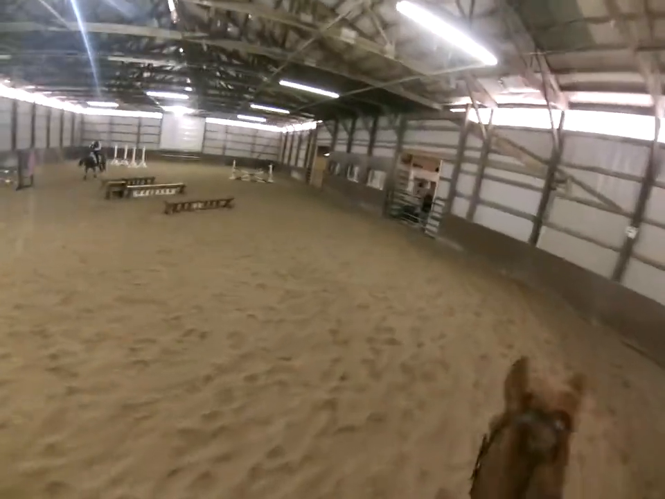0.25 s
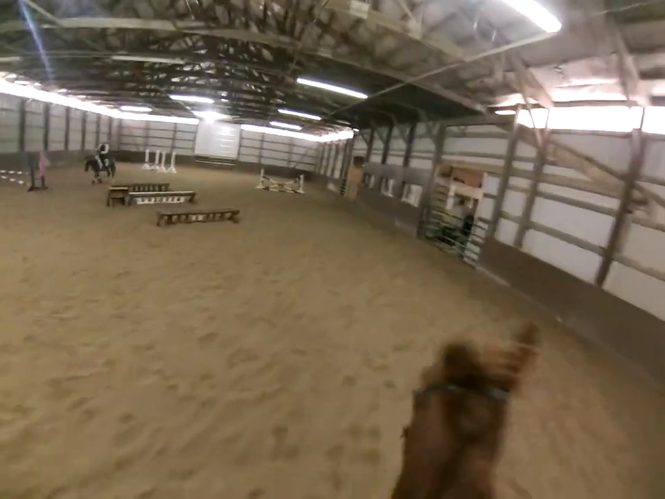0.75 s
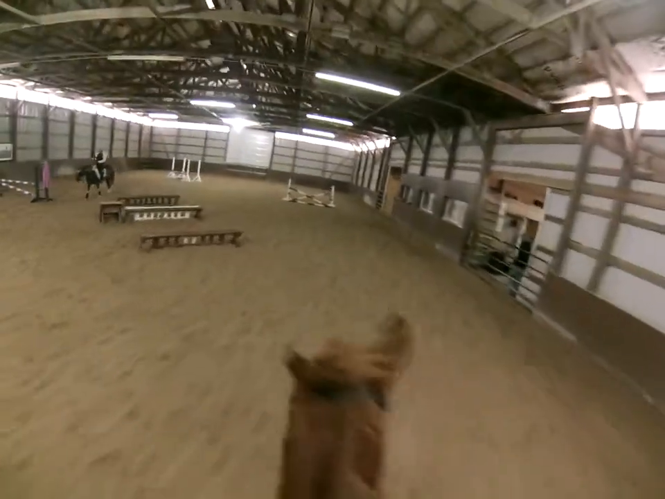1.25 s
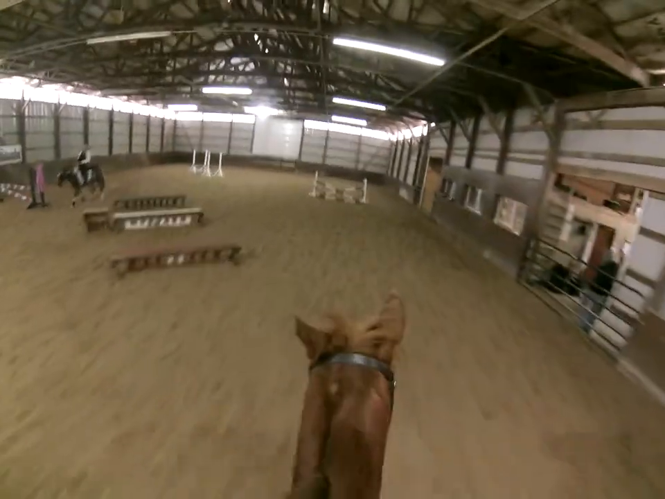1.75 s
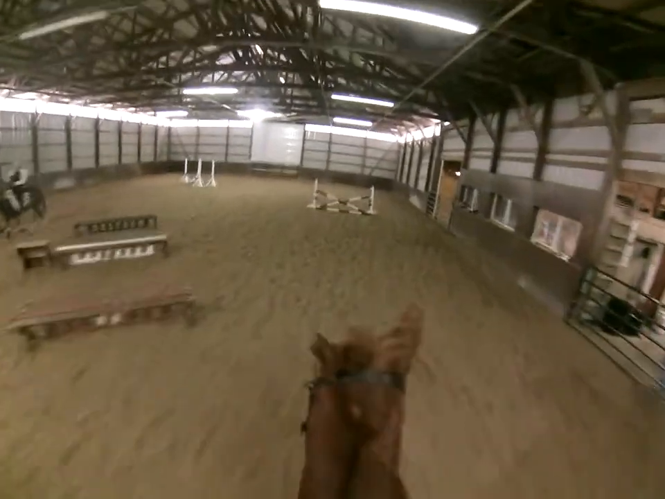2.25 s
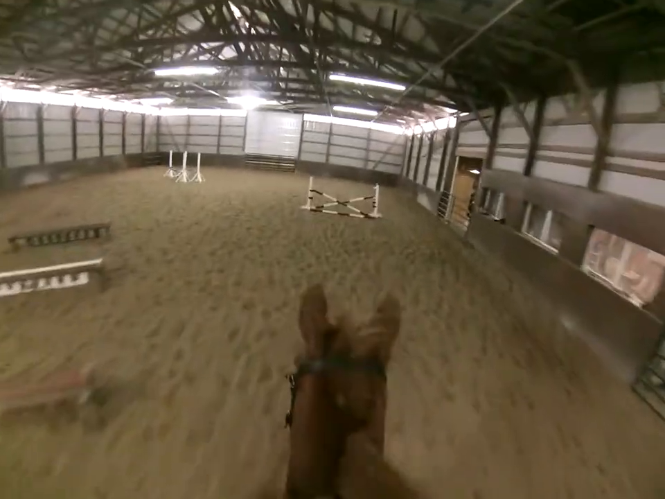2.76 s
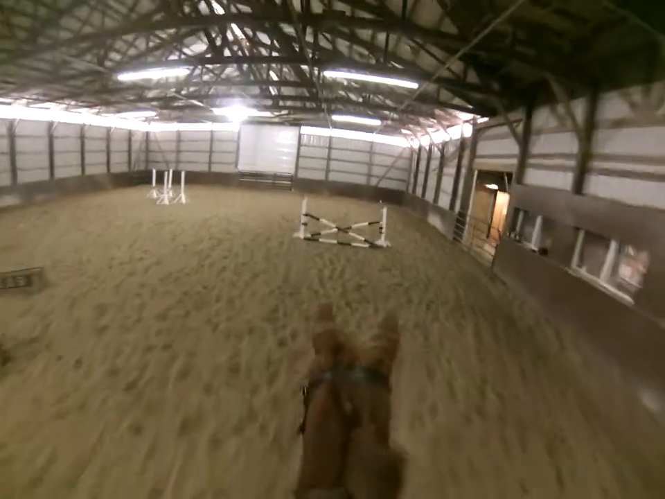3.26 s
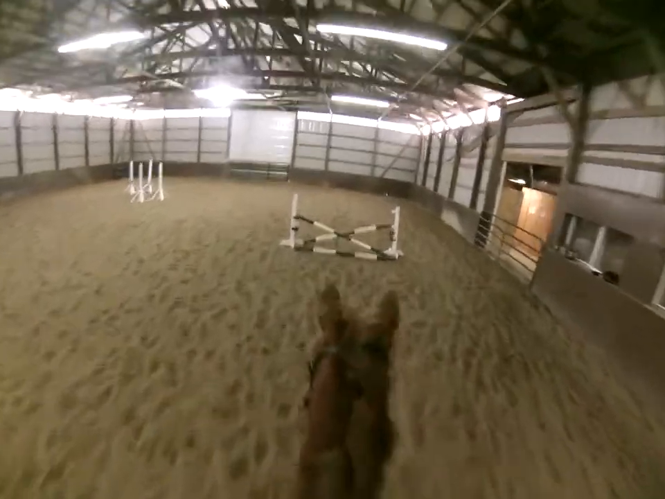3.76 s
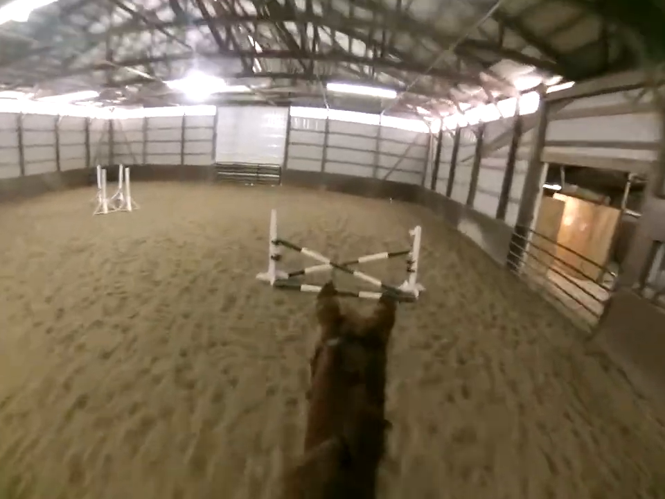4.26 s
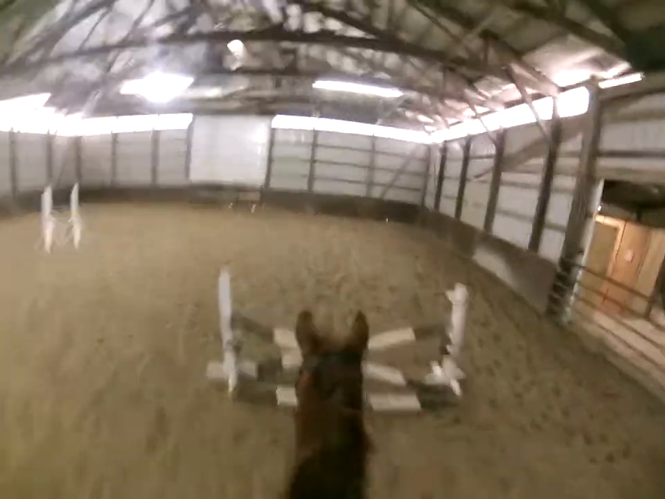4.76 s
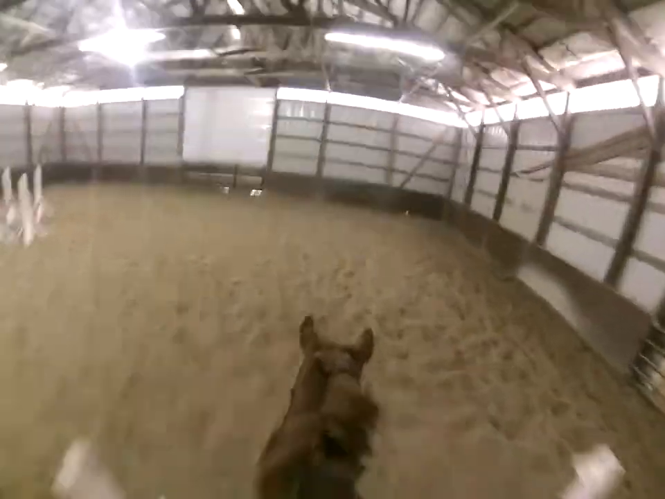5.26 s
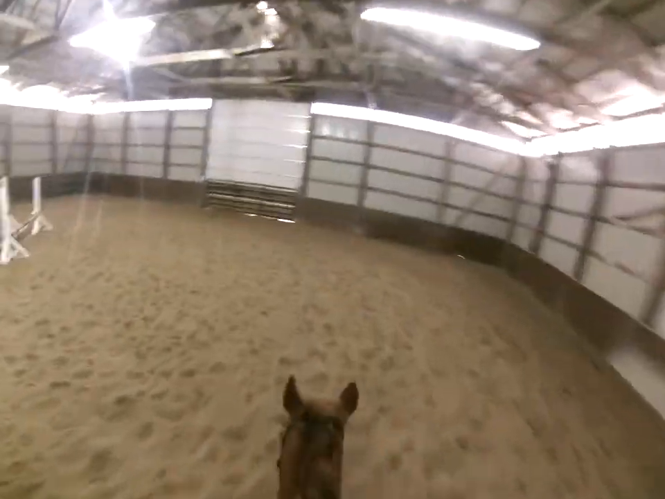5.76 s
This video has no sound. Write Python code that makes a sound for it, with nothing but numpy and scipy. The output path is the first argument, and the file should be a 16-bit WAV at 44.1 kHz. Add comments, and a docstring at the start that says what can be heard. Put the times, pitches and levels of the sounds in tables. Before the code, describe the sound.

Close, muffled, single-channel sound worn on a rider's head: low-frequency jolts pulse with the canter, with soft hoof thudding beneath. The camera taps and clacks against its shell, lightly at first, then sharply. A cluster of dry ticks and brushing comes before a low jump, a short silence of jolts follows, then a heavy landing with clattering and more rustle.

```python
"""Helmet camera on a cantering horse

A camera in a sealed plastic housing rides on a helmet while the horse canters over sand in a hall.
Jolts and head sway swell bands of low noise into a deep rumble; the camera knocks against its housing
as soft pushes, low rebounds and short shell rings; straps slip in dry ticks made of sudden jumps.
Low-noise thuds, rustle and a faint leather squeak filtered by resonances lie beneath, over steady hiss."""
import sys
import numpy as np
from scipy import signal
from scipy.fft import rfft, irfft
from scipy.io import wavfile
from scipy.ndimage import uniform_filter1d

SR = 44100
rng = np.random.default_rng(int(sys.argv[2]) if len(sys.argv) > 2 else 0)


def gain_from_decibels(decibels):
    """Convert decibel values to linear amplitude factors."""
    exponent = np.asarray(decibels, float) / 20
    return 10 ** exponent


def master_out(mix):
    """Clip the mix to full scale and print it as 16-bit PCM to the path in sys.argv[1]."""
    frames = np.transpose(np.atleast_2d(mix))
    ceiling = np.clip(frames, -1, 1)
    pcm = np.round(ceiling * 32767).astype(np.int16)
    wavfile.write(sys.argv[1], SR, pcm)


N = 264600

# microphone hiss: (frequency [Hz], relative level [dB])
HISS_SPECTRUM = [(200, 4.5), (1000, -1), (3000, -3.5), (6000, -6.5), (12000, -10.5), (13500, -12.5),
                 (15500, -12), (16500, -33)]
HISS_DB = -67.5

# hooves and body through the shell: (time [s], level before a 7 dB lift [dB])
THUD_LEVELS = [(0.0, -64), (1.3, -58.5), (1.7, -63), (2.4, -58.5), (3.1, -62.5), (3.7, -57), (4.4, -62),
               (4.7, -54.5), (5.05, -59), (5.25, -53), (5.45, -61), (6.0, -58)]
# colour of the steady thudding: (frequency [Hz], relative level [dB])
THUD_SPECTRUM = [(30, -10.5), (50, -4.5), (100, -10.5), (200, -17.5), (300, -21), (420, -25), (520, -36),
                 (900, -42.5), (1500, -40), (8000, -110)]
# colour of the brighter thudding around footfalls: (frequency [Hz], relative level [dB])
STRIDE_SPECTRUM = [(200, -22.0), (400, -3.5), (700, -6.0), (1000, -19.0), (3000, -75)]
STRIDE_SPAN_S, STRIDE_GAIN_DB = 0.077, -59.5

# modes of the plastic shell: (frequency [Hz], relative level [dB], decay by 60 dB [s])
SHELL_MODES = [(660, -15.5, 0.0031), (1100, -13, 0.022), (1496, -3, 0.019), (1680, -13.5, 0.014),
               (2110, -1.5, 0.011), (2380, -10.5, 0.01), (2890, -23, 0.0094), (3230, -16, 0.011),
               (3650, -27, 0.007), (4020, -34, 0.0092), (4860, -21, 0.016), (5330, -26, 0.0073)]

# sand and tack brushing past:
# (start [s], length [s], coarse grit in lower shell modes [dB], fine grit in upper ones [dB])
SWISHES = [(0.02, 0.05, -88, -80), (1.545, 0.056, -84, -79), (1.94, 0.04, -77, -92),
           (0.565, 0.07, -90, -76.5), (1.134, 0.22, -84, -89), (1.878, 0.055, -77, -81),
           (2.362, 0.11, -82, -96), (3.023, 0.16, -82, -85), (3.48, 0.095, -77, -75),
           (4.02, 0.18, -78, -81), (4.516, 0.24, -77, -83), (4.78, 0.039, -61.5, -63.5),
           (4.83, 0.092, -75, -78), (4.978, 0.12, -76, -68.5), (5.114, 0.035, -64, -66),
           (5.2, 0.071, -75, -79), (5.307, 0.016, -86, -83), (5.366, 0.038, -73, -84),
           (5.497, 0.11, -71, -77.5), (5.637, 0.091, -69.5, -70.5), (5.739, 0.15, -71, -73.5)]
SWISH_ATTACK_S, SWISH_RELEASE_S = 0.0047, 0.016
RUSTLE_AT_REST_DB = (-81.5, -79.5)   # coarse, fine

# a faint squeak of leather: (start [s], end [s], frequency [Hz], level [dB])
SQUEAK = (3.845, 3.93, 2410, -72)

# strap and clip slipping: (time [s], typical jump [dB], length of run [ms], gap between jumps [ms])
TICKS = [(1.921, -36.5, 0.5, 1.1), (1.925, -49, 1.5, 0.69), (4.674, -30, 1, 1.87), (4.686, -40, 0, 1),
         (4.7218, -36, 1.5, 0.93), (4.7238, -34.5, 2, 1.12), (4.7347, -35.5, 0, 0.53),
         (4.7404, -51, 4, 2.5), (4.751, -44, -0.5, 1), (4.755, -48, 4, 1), (5.1714, -36.5, 6, 0.52),
         (5.182, -43.5, 2.5, 1), (5.1965, -51, 1, 1), (5.2, -42, 0.5, 1.1), (5.205, -43, 1.5, 1.54),
         (5.2123, -42, 1.5, 1.4), (5.217, -39, 0.5, 1.4), (5.222, -41, 1.5, 1.4), (5.2269, -37, 1.5, 0.86),
         (5.2325, -40.5, 2, 1.3), (5.2564, -43, 0, .4)]

# camera against housing (the row at 0.752 s is a sharp footfall jolt sounded the same way): (time [s], push
# drive [dB], shell ring drive [dB], ring brightness [dB per octave])
KNOCKS = [(0.364, -43.5, -61, -4), (0.752, -47, -70, -2), (0.8979, -47, -60, 2), (1.099, -51, -63, -2),
          (1.403, -33.5, -47.5, -22), (1.5362, -66, -47.5, -6), (1.5743, -41.5, -52, 8),
          (1.888, -36.5, -59, -4), (1.897, -55, -53, 0), (1.904, -52, -51, 9), (1.9165, -20.5, -36, -5),
          (2.106, -38, -71, -2), (2.1272, -19, -35.5, 2), (2.1288, -60, -47, -4), (2.491, -38.5, -70, -2),
          (3.027, -38.5, -52, 3), (3.145, -42, -62, 0), (3.27, -43.5, -67, -2), (3.491, -70, -47.5, 3),
          (3.6201, -16.5, -14, 3), (3.8255, -19, -26.5, 7), (4.087, -43, -61, -5),
          (4.1604, -29, -35.5, -10), (4.1615, -60, -34.5, 4), (4.1665, -17, -19, -6.5),
          (4.24, -69, -50, 12), (4.323, -40, -63, -2), (4.34, -64, -51, 5), (4.6197, -45.5, -65, -5),
          (4.6607, -25, -43, -3), (4.692, -33, -47, -8), (4.702, -41, -55, -4), (4.7743, -34.5, -55, -9),
          (4.8012, -27.5, -49, 2), (5.13, -22.5, -26, -16), (5.228, -21.5, -38, -18),
          (5.2745, -38.5, -56, -2), (5.31, -35, -24.5, -6), (5.3164, -17, -16.5, 12.5),
          (5.457, -50, -48, -13.5), (5.5078, -50, -39.5, -4), (5.937, -46, -68, 0)]
# mount springing back after a knock: (frequency [Hz], gain [dB], decay by 60 dB [s])
REBOUND_MODES = [(65.0, -34.0, 0.069), (91.7, -29.5, 0.056), (40.6, -36.0, 0.35),
                 (115.0, -47.0, 0.077), (224.0, -50.0, 0.087)]
SAME_SIDE_S = 0.05   # a knock this soon after the last hits the same wall
# each blow bounces three times: nominal delay [s] and strength [dB]
CHATTER_S, CHATTER_DB = (0.00051, 0.001468, 0.00304), (-7.5, -19, -17)

# hooves meeting the sand, felt as jolts in the mount: (time [s], shake level [dB])
FOOTFALLS = [(0.1, -36.5), (0.222, -20.5), (0.29, -35), (0.358, -27.5), (0.63, -34.5), (0.772, -23.5),
             (0.81, -28), (0.859, -27.5), (0.94, -34.5), (1.28, -29.5), (1.362, -20.5), (1.422, -22),
             (1.515, -34), (1.854, -30.5), (1.969, -18), (2.143, -23), (2.376, -34.5), (2.483, -20),
             (2.539, -27.5), (2.729, -49), (2.83, -39), (2.934, -29), (3.051, -18), (3.12, -28),
             (3.186, -36), (3.282, -39), (3.508, -33), (3.585, -24.5), (3.645, -29), (3.765, -27.5),
             (3.845, -25), (3.98, -31), (4.11, -27.5), (4.187, -17), (4.331, -31), (4.571, -30),
             (4.675, -16.5), (4.73, -21.5), (4.788, -36), (5.173, -13.5), (5.254, -25), (5.319, -24),
             (5.461, -43), (5.542, -26.5), (5.61, -34.5), (5.724, -31.5), (5.826, -15.5), (5.93, -31)]
JOLT_RISE_S, JOLT_FALL_S, SHAKE_AT_REST_DB = 0.026, 0.02, -43
# colour of the shaking mount: (frequency [Hz], relative level [dB])
SHAKE_SPECTRUM = [(12, -47.0), (22, -2.0), (30, 1.5), (47, 0.5), (58, -24.5), (75, -37.0),
                  (150, -53.0), (1500, -160)]
# the rider's head nodding: (time [s], sway level [dB])
NODS = [(0.294, -29), (0.803, -24), (0.93, -30), (1.35, -23), (1.469, -21.5), (1.917, -18), (2.094, -31.5),
        (2.434, -31.5), (2.533, -23.5), (3.05, -19.5), (3.21, -24.5), (3.636, -19), (3.79, -33),
        (3.982, -31.5), (4.169, -23), (4.3, -27), (4.61, -38), (4.748, -17), (5.153, -19), (5.3, -23.5),
        (5.411, -20.5), (5.823, -21), (5.92, -24.5)]
NOD_RISE_S, NOD_FALL_S, SWAY_AT_REST_DB = 0.041, 0.055, -38.5
# colour of the head sway: (frequency [Hz], relative level [dB])
SWAY_SPECTRUM = [(2, -0.5), (6, 1.0), (12, 5.5), (20, -5.5), (26, -16.5), (60, -65), (600, -160)]


def rms_one(x):
    """Scale to unit power."""
    return x / np.sqrt(np.mean(x ** 2) + 1e-20)


def coloured(spectrum):
    """Noise with the given spectrum, drawn over log frequency, at rms 1."""
    hz, db = np.transpose(spectrum)
    bins_hz = np.maximum(np.arange(N // 2 + 1) * SR / N, 1)
    gain = gain_from_decibels(np.interp(np.log(bins_hz), np.log(hz), db))
    return rms_one(irfft(rfft(rng.standard_normal(N)) * gain, N))


def flutter(per_s):
    """Slow wandering: straight lines between random knots of spread 1."""
    knots = rng.standard_normal(int(N / SR * per_s) + 2)
    return np.interp(np.arange(N) / SR * per_s, np.arange(len(knots)), knots)


def evened(x, span_s):
    """Slow swings of level are largely divided out."""
    span = int(span_s * SR)
    power = uniform_filter1d(uniform_filter1d(x ** 2, span), span)
    return x / np.sqrt(power + 0.2 * np.mean(x ** 2))


def swells(events, rise_s, fall_s, rest_db):
    """Each event is a bell of power with its own peak; powers add over a resting level."""
    t = np.arange(0, N, 32) / SR   # slow enough to draw at every 32nd sample
    power = gain_from_decibels(2 * rest_db)
    for s, db in events:
        span_s = np.where(t < s, rise_s, fall_s)
        power = power + gain_from_decibels(2 * db) * np.exp(-((t - s) / span_s) ** 2)
    return np.interp(np.arange(N) / SR, t, np.sqrt(power))


def clicks_at(times, heights):
    """Single samples at the given seconds."""
    out = np.zeros(N)
    np.add.at(out, (np.asarray(times) * SR).astype(int), heights)
    return out


def contact(x, ms):
    """A blow spread over a bell-shaped touch of standard deviation ms, centred on its moment."""
    bell = np.exp(-0.5 * (np.arange(-200, 201) / (ms * SR / 1000)) ** 2)
    return np.convolve(x, bell, "same")


def ring(clicks, hz, t60):
    """A two-pole resonance: a unit click sets a decaying sine of starting height 1 ringing."""
    r, w = gain_from_decibels(-60 / (t60 * SR)), 2 * np.pi * hz / SR
    return signal.lfilter([0, np.sin(w)], [1, -2 * r * np.cos(w), r * r], clicks + 1e-18)


def hiss():
    """Steady microphone noise, shaped by its spectrum."""
    return gain_from_decibels(HISS_DB) * coloured(HISS_SPECTRUM)


def thudding():
    """Hooves and body as lumpy low noise, with brighter noise swelling around each footfall."""
    thud_db = np.interp(np.arange(N) / SR, *np.transpose(THUD_LEVELS))
    lumpy = rms_one(coloured(THUD_SPECTRUM) * gain_from_decibels(2.5 * flutter(25.0)))
    steady = gain_from_decibels(thud_db + 7.0) * lumpy
    # the root halves the swing of the jolts in dB
    stride = swells(FOOTFALLS, STRIDE_SPAN_S, STRIDE_SPAN_S, -63.0) ** 0.5
    return steady + gain_from_decibels(STRIDE_GAIN_DB) * stride * coloured(STRIDE_SPECTRUM)


def rustle():
    """Grainy noise heard only through shell modes, each applied twice for steep sides."""
    out, t = 0, np.arange(N) / SR
    for k, modes in enumerate((SHELL_MODES[2:4], SHELL_MODES[4:6])):   # coarse, then fine grit
        level = gain_from_decibels(RUSTLE_AT_REST_DB[k] + 1.8 * flutter(11.0))
        for s, length, *dbs in SWISHES:
            corners = [s - SWISH_ATTACK_S, s, s + length, s + length + SWISH_RELEASE_S]
            level = level + gain_from_decibels(dbs[k]) * np.interp(t, corners, [0, 1, 1, 0])
        grit = rng.standard_normal(N) * gain_from_decibels(2.0 * flutter(50.0))
        # each pass rings for half the mode's decay
        through = sum(ring(ring(grit, hz, 0.5 * t60), hz, 0.5 * t60) for hz, _, t60 in modes)
        out = out + level * rms_one(through)
    return out


def squeak():
    """Leather rubbing: noise twice through one narrow resonance, faded in and out over 20 ms."""
    start, end, hz, db = SQUEAK
    rubbing = ring(ring(rng.standard_normal(N), hz, 0.05), hz, 0.05)
    stroke = np.interp(np.arange(N) / SR, [start, start + 0.02, end - 0.02, end], [0, 1, 1, 0])
    return gain_from_decibels(db) * stroke * evened(rubbing, 0.03)


def ticks():
    """Each slip is a run of sudden jumps in one direction, each relaxing over some 5 ms."""
    jumps = np.zeros(N)
    chance = rng.standard_normal((len(TICKS), 25))
    for (s, db, run_ms, gap_ms), luck in zip(TICKS, chance):
        steps = np.arange(min(round(run_ms / gap_ms) + 1, 12))
        later = steps > 0   # the first jump keeps its exact time and level
        times = s + gap_ms * (steps + 0.13 * luck[steps] * later) / 1000
        direction = np.sign(luck[24])
        jumps += clicks_at(times, direction * gain_from_decibels(db + 2.5 * luck[12 + steps] * later))
    # a jump takes a few hundredths of a ms
    jumps = signal.lfilter(*signal.butter(1, 7000.0, fs=SR), jumps)
    # a leaky sum turns each click into a step that sinks back
    return signal.lfilter([1], [1, -np.exp(-2 * np.pi * 29.0 / SR)], jumps)


def air_push(s, side, push_db, ring_db):
    """The air inside is pushed softly; louder-ringing knocks touch slightly more briefly."""
    hardness = np.clip((ring_db + 70.0) / 330.0, 0, 1)
    hard_share = hardness ** 0.5
    heights = side * gain_from_decibels(push_db + 1.5)
    push = contact(clicks_at(s, heights * hard_share), ms=0.54)
    push = push + contact(clicks_at(s, heights * (1 - hard_share)), ms=0.56)
    return signal.lfilter(*signal.butter(1, 90.0, "high", fs=SR), push)


def mount_rebound(s, side, push_db):
    """The mount springs back the other way 1.2 ms later and rings in its low modes."""
    back = contact(clicks_at(s + 0.0012, -side * gain_from_decibels(push_db - 0.5)), ms=0.26)
    return sum(gain_from_decibels(db) * ring(back, hz, t60) for hz, db, t60 in REBOUND_MODES)


def shell_ring(s, side, ring_db, bright_db):
    """Each blow and its three bounces ring the shell modes for a few ms."""
    strengths = rng.normal(0, 1.5, (len(s), len(SHELL_MODES)))   # dB, varies by knock and mode
    late = rng.uniform(0.9, 1.12, (len(s), 3)) * CHATTER_S
    shell = 0
    for k, (hz, db, t60) in enumerate(SHELL_MODES):
        tilt_db = bright_db * np.log2(hz / 1500)   # sharper blows reach the high modes better
        first = side * gain_from_decibels(ring_db + db + tilt_db + strengths[:, k])
        bounces = clicks_at(s[:, None] + late, first[:, None] * gain_from_decibels(CHATTER_DB))
        shell = shell + ring(clicks_at(s, first) + bounces, hz, t60)
    # a small shell radiates little bass
    shell = signal.lfilter(*signal.butter(1, 500.0, "high", fs=SR), shell)
    return gain_from_decibels(-21.5) * contact(shell, ms=0.093)


def knocks():
    """Camera meets housing: a push of the air, the mount springing back and the shell ringing. One sharp
    footfall jolt is sounded the same way."""
    s, push_db, ring_db, bright_db = np.transpose(KNOCKS)
    bout = np.cumsum(np.diff(s, prepend=0) > SAME_SIDE_S)
    side = np.sign(rng.standard_normal(len(s) + 1))[bout]   # front or back wall, by chance
    return (air_push(s, side, push_db, ring_db) + mount_rebound(s, side, push_db)
            + shell_ring(s, side, ring_db, bright_db))


def rumble():
    """The jolted mount wobbles in a broad low resonance; the head sways below it."""
    shake = evened(coloured(SHAKE_SPECTRUM), 0.039)
    sway = evened(coloured(SWAY_SPECTRUM), 0.024)
    restless = gain_from_decibels(3.24 * flutter(14.0))
    jolts = swells(FOOTFALLS, JOLT_RISE_S, JOLT_FALL_S, SHAKE_AT_REST_DB)
    nods = swells(NODS, NOD_RISE_S, NOD_FALL_S, SWAY_AT_REST_DB)
    return jolts * shake * restless + nods * sway


def scene():
    """All layers add up at one microphone."""
    mix = rumble() + thudding() + rustle() + squeak() + knocks() + ticks() + hiss()
    return mix[None]   # one channel


def low_pass(x):
    """Removes everything above the highest recorded frequency."""
    return signal.sosfilt(signal.butter(12, 15400, fs=SR, output="sos"), x)


def record(dry):
    """Hands on the finished mix with no further balance or tone control."""
    return low_pass(dry)


dry = scene()
out = record(dry)
master_out(out)
```